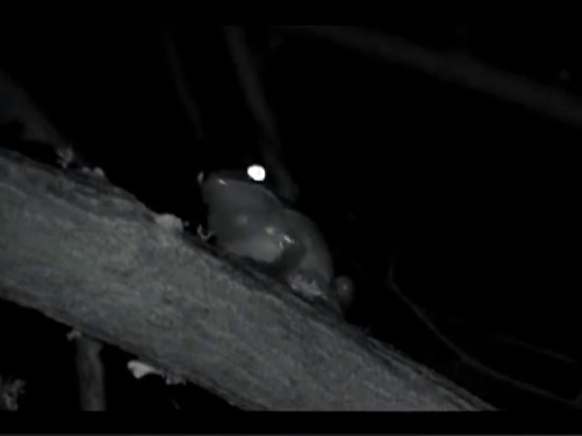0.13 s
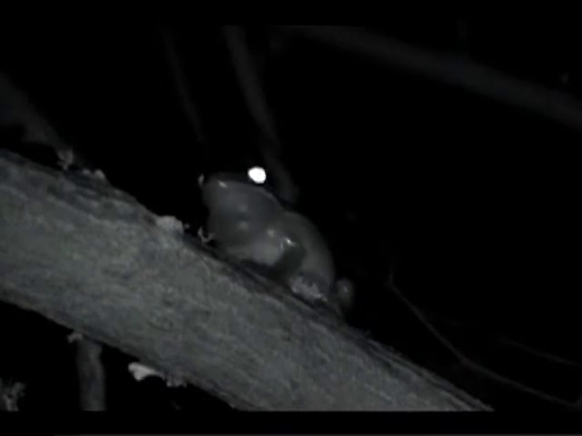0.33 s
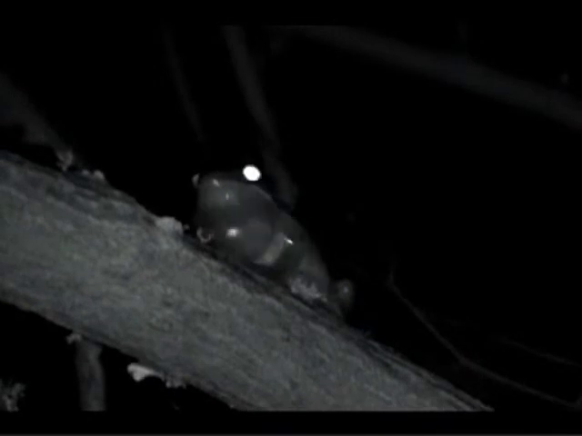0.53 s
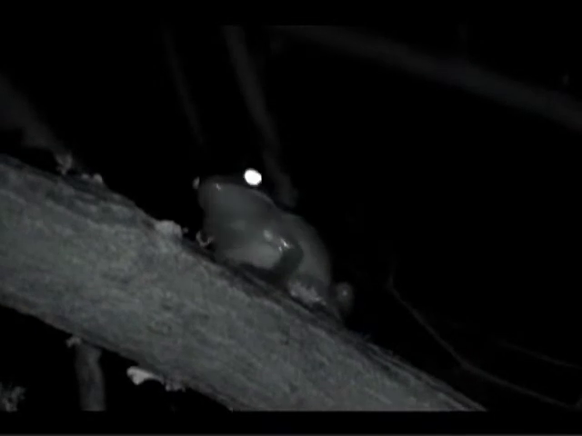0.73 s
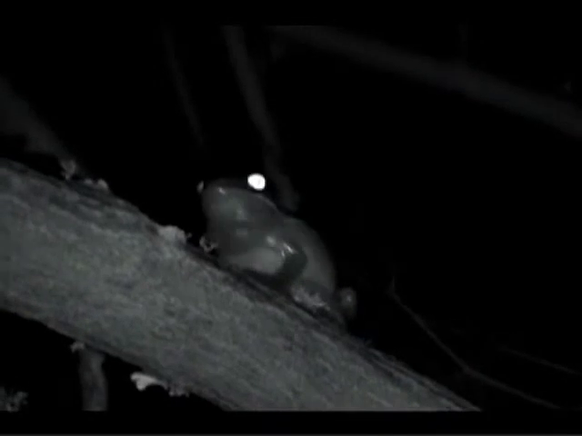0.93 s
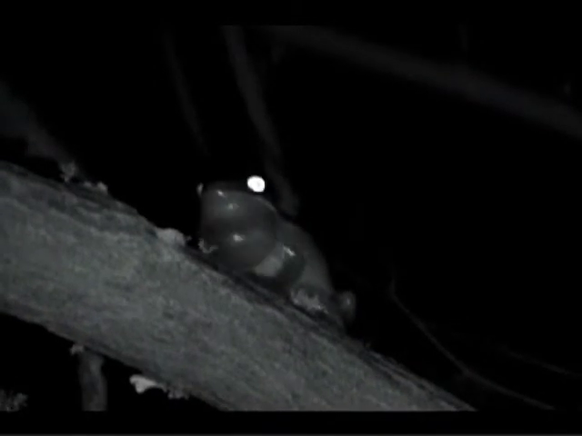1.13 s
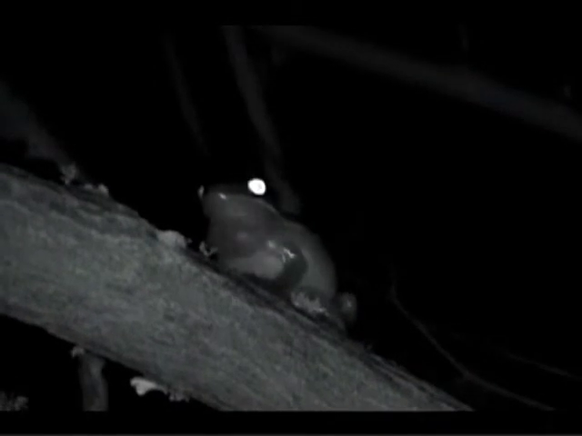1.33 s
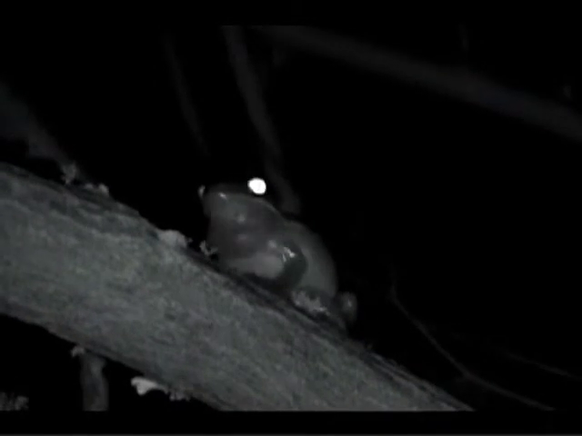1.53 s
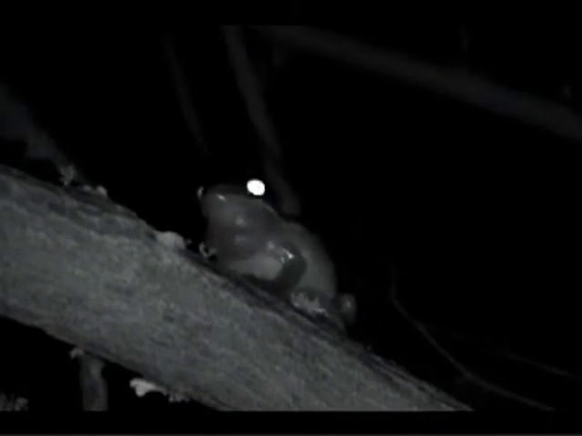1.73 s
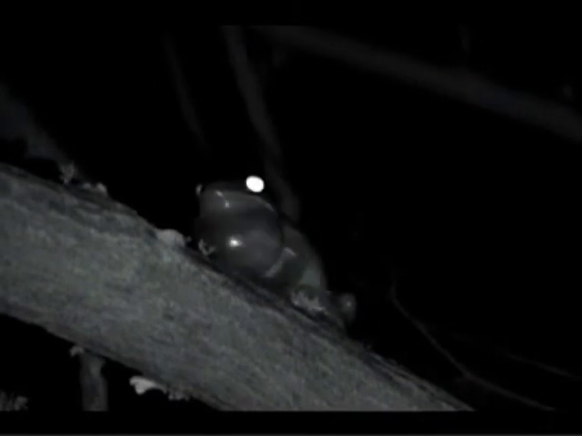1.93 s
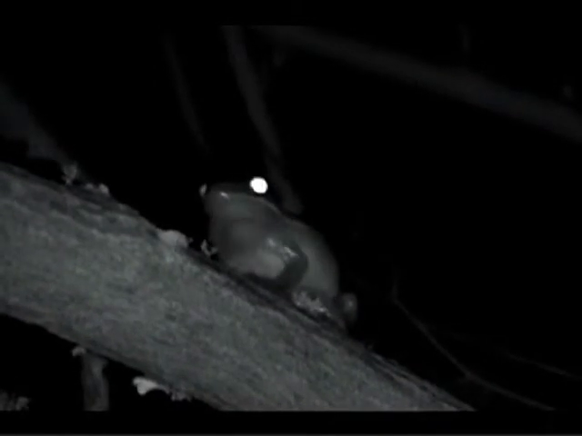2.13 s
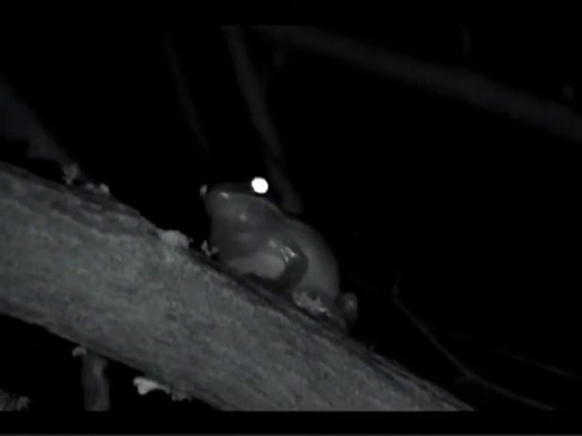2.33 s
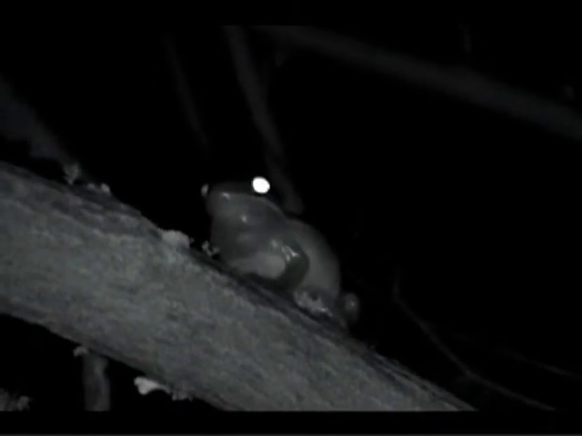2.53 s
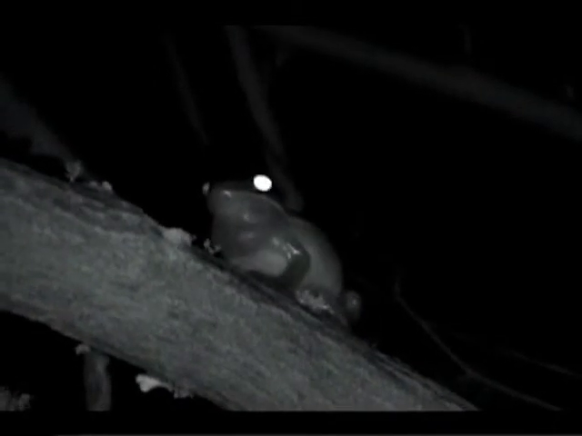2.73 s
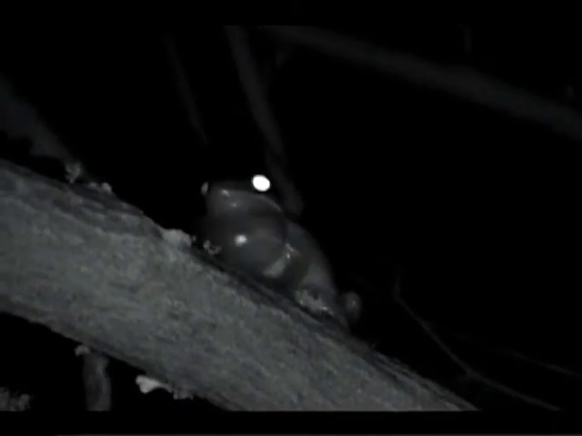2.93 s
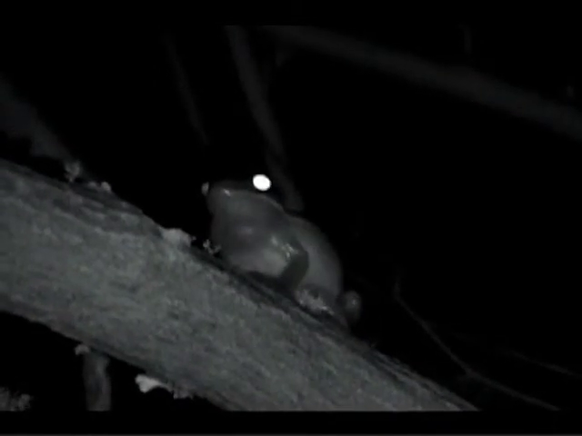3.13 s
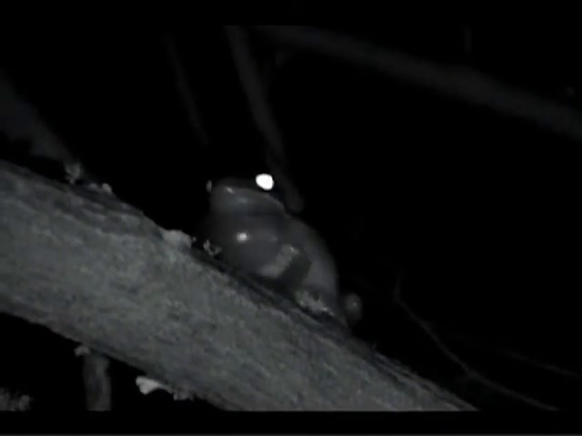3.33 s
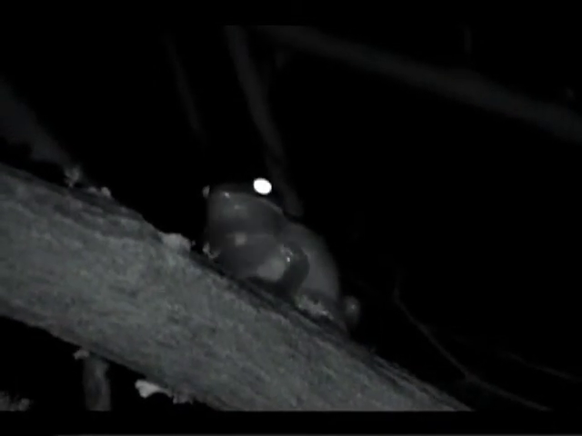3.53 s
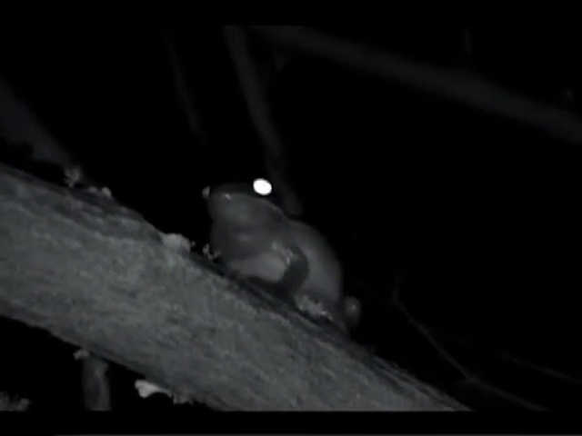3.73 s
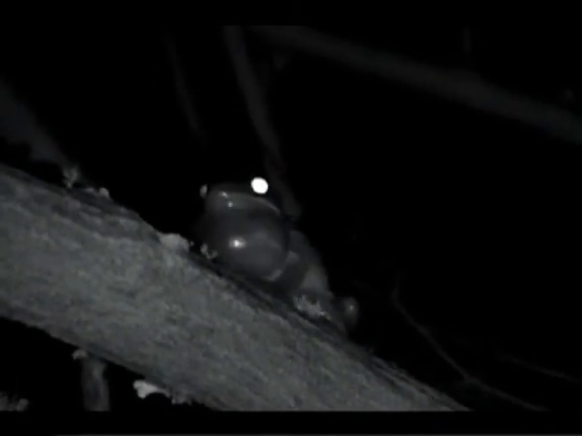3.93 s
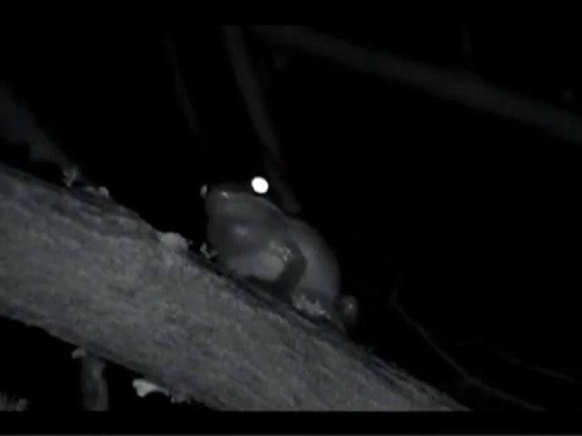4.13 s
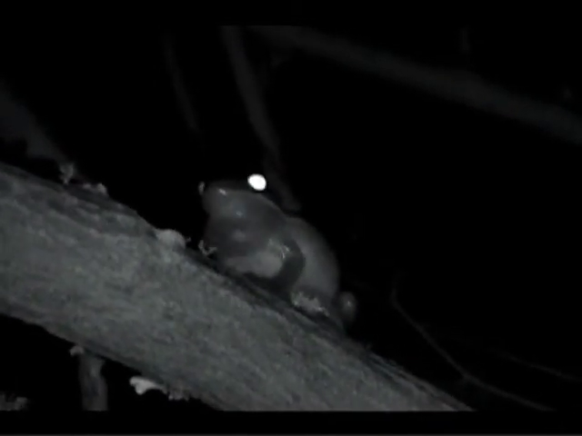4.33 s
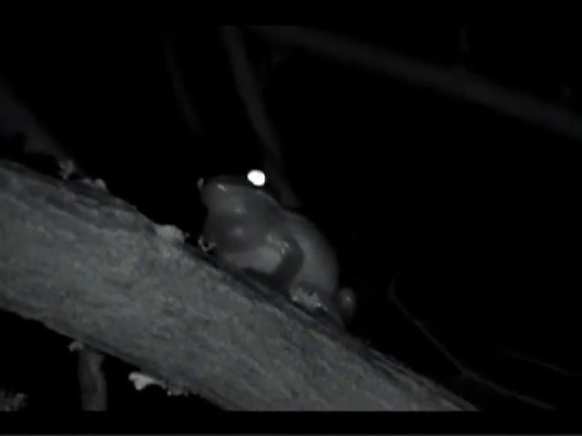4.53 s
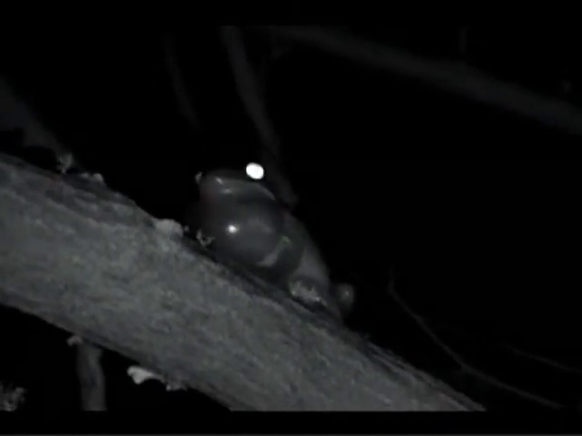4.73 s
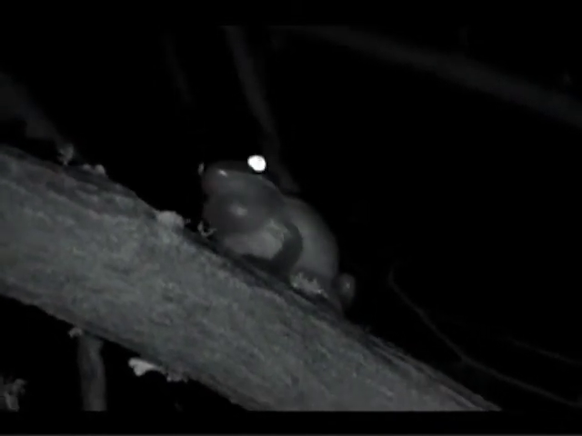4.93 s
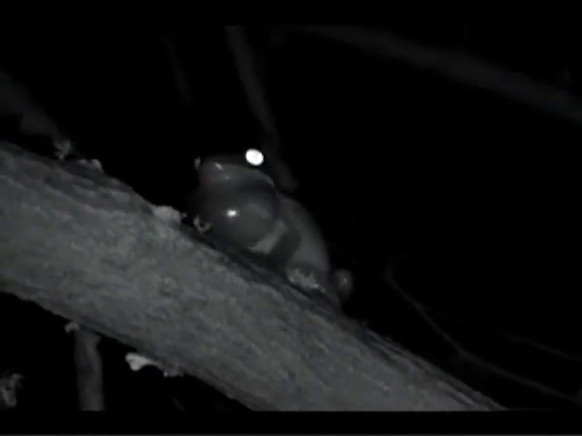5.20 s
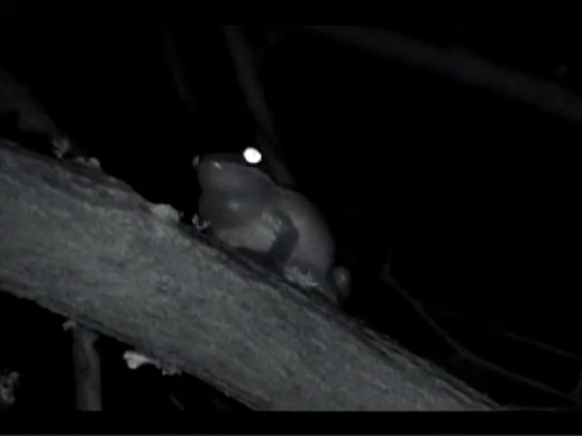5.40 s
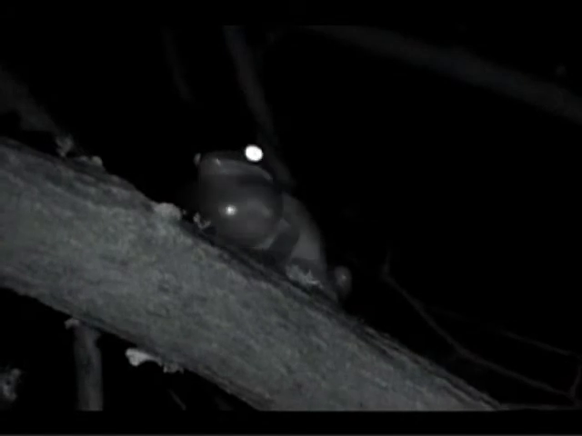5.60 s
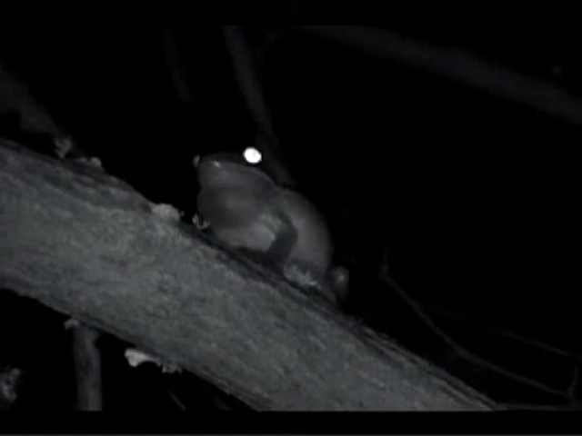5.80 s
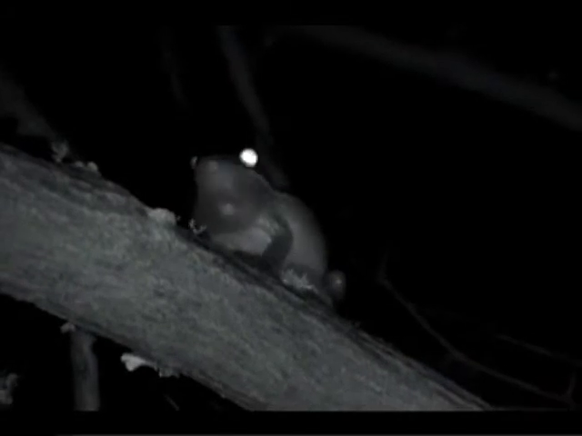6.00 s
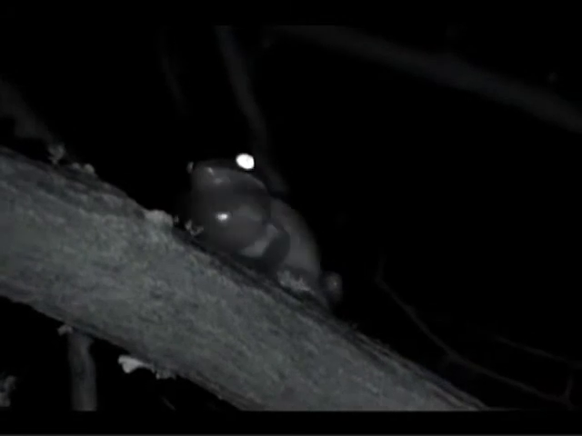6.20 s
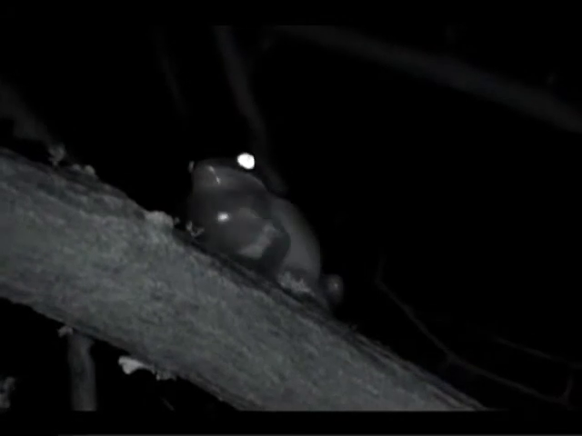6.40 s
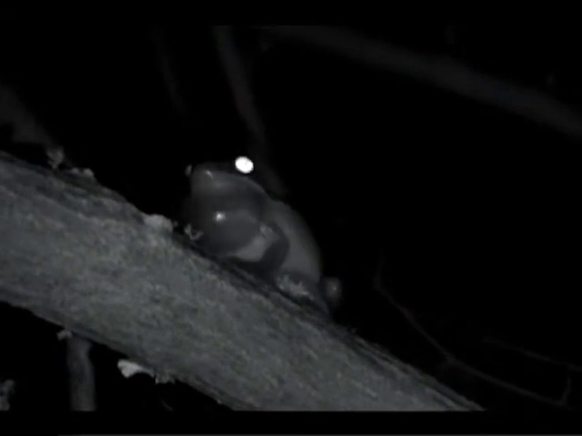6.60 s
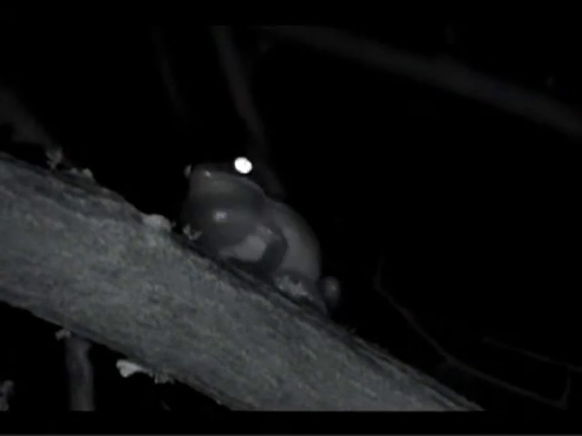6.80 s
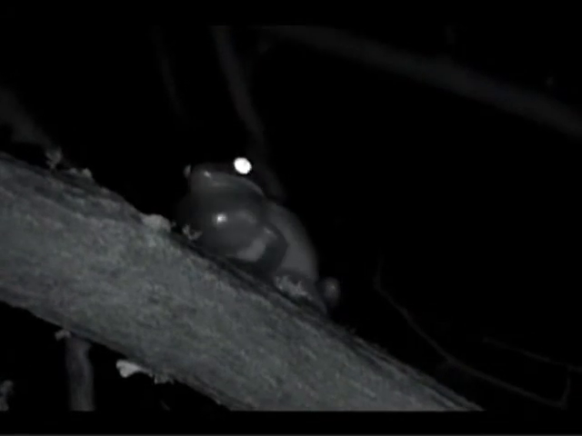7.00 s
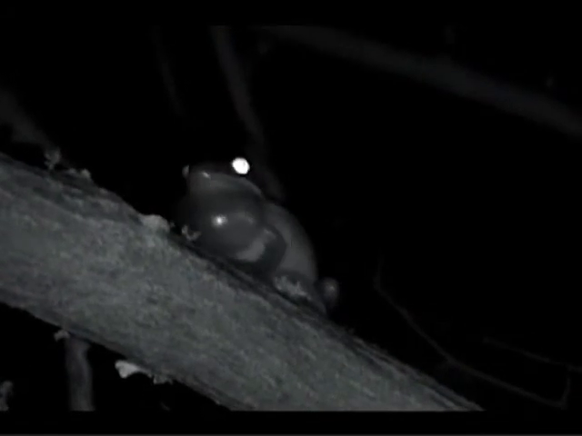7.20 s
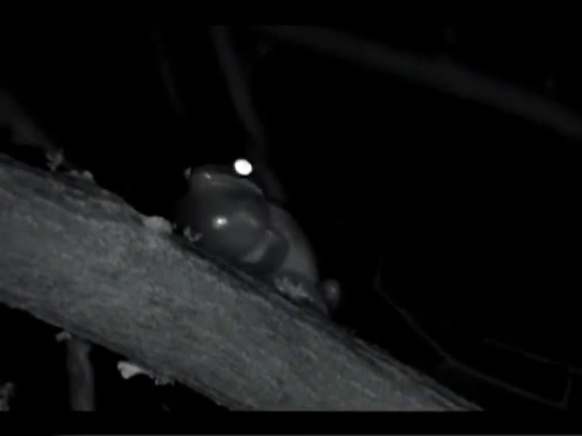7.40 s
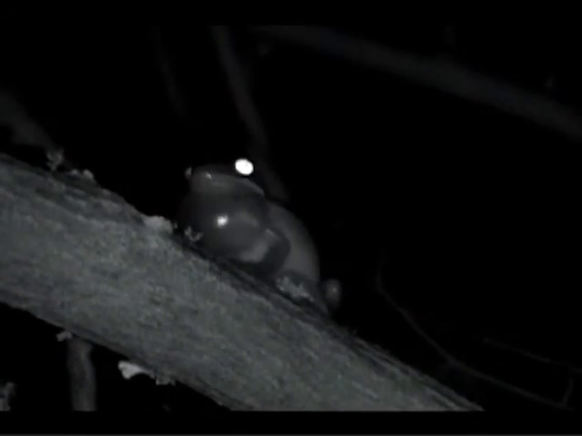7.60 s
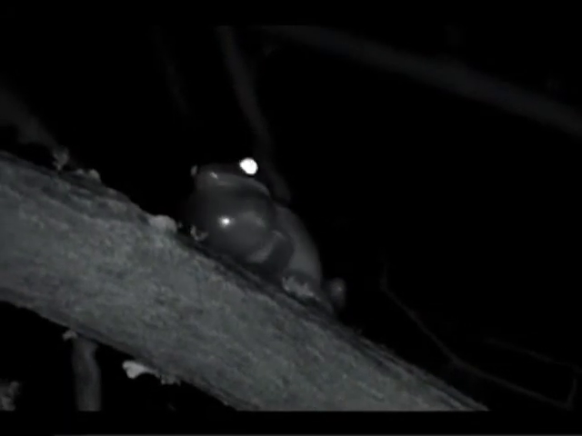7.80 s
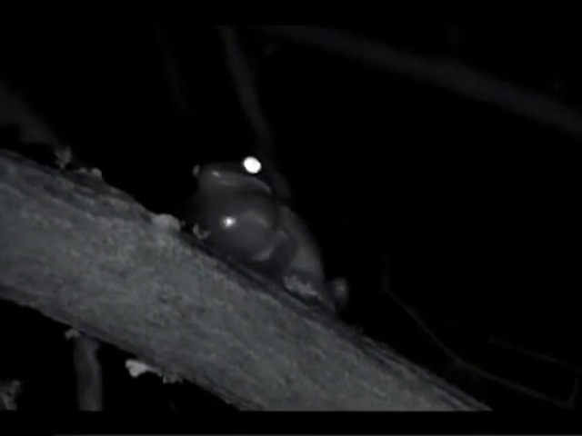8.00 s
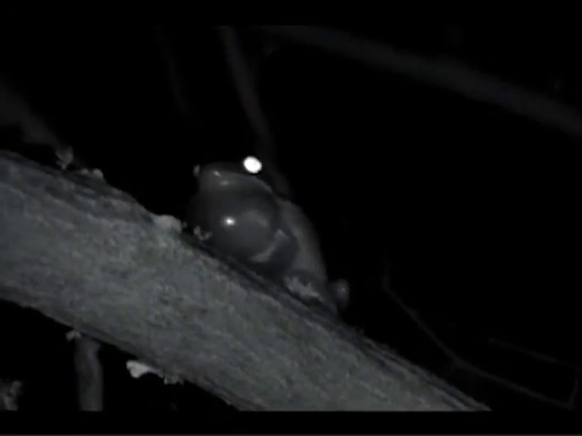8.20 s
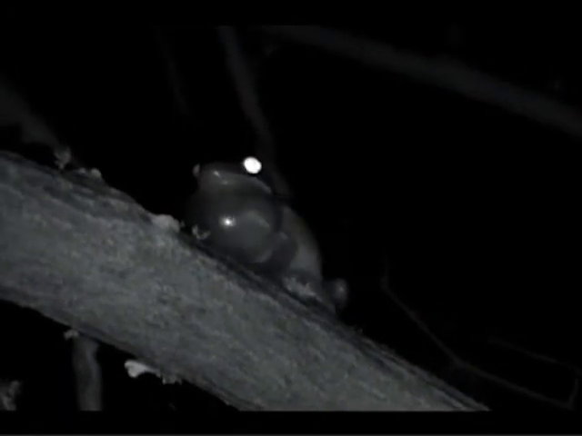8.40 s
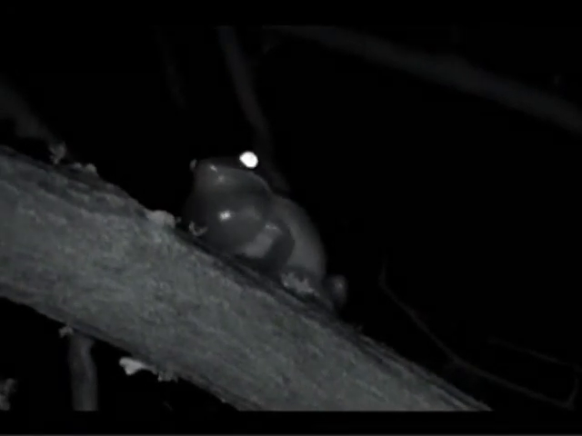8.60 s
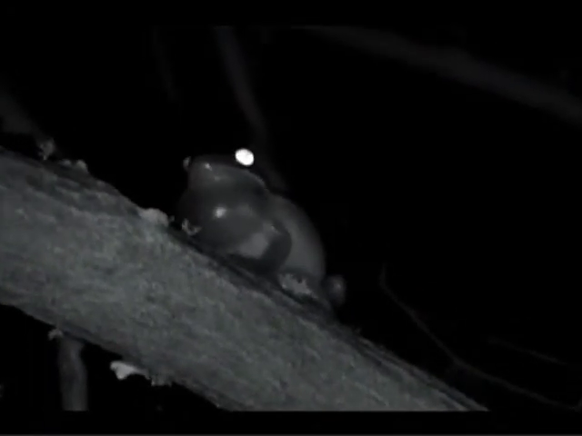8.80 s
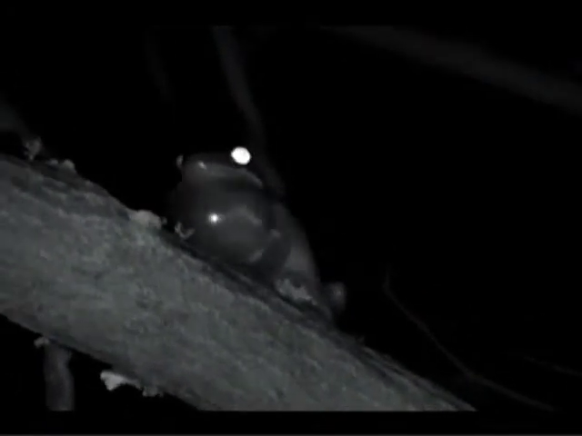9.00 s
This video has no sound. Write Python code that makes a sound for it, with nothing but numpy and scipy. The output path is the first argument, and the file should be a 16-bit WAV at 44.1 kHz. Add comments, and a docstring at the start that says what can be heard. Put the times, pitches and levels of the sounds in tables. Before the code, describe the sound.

Night outdoors: one small frog squeaks weakly, honks louder and louder, then hurries into quick stuttered calls while leaves crackle quietly nearby.

```python
"""On a branch at night a tree frog calls, close by: three thin squeaks, then full honks, then quick stuttering calls.
Its vocal cords swing near 1 kHz; rasp makes every third swing stand out, which gives the honk its nasal sound.
Leaves rustle and crunch nearby as bursts of tiny snaps; far frogs and insects are bands of noise over soft night air.
Short echoes surround the frog, and the recorder's limiter turns everything down when a call gets too loud."""
import sys
import numpy as np
from scipy import signal
from scipy.fft import rfft, irfft, next_fast_len
from scipy.io import wavfile
from scipy.ndimage import uniform_filter1d, minimum_filter1d

SR = 44100
rng = np.random.default_rng(int(sys.argv[2]) if len(sys.argv) > 2 else 0)


def transcribe(u):
    """Save the signal u as a 16-bit wav file named by the first command-line argument.

    u: samples, shape (n,) or (channels, n), limited to [-1, 1]; the rate is SR.
    q: integer samples, one column per channel.
    """
    v = np.clip(np.atleast_2d(u).T, -1, 1)
    q = np.round(v * 32767).astype(np.int16)
    wavfile.write(sys.argv[1], SR, q)


N = 398223
TIME = np.arange(N) / SR

# Warm-up squeaks. Each row: start in seconds, length in seconds, time to the crack in seconds,
# length of the crack in seconds, level in dB, pitch before the crack in Hz, pitch after it in Hz,
# change of level across it in dB.
SQUEAK_CALLS = [(0.416, 0.061, 0.026, .021, -18.5, 891, 954, -8),
                (0.936, 0.054, .017, 0.016, -13, 951, 949, 0),
                (1.823, 0.061, 0.013, 0.032, -12.5, 964, 1090, 3.5)]
# Honks. Each row: start in seconds, length in seconds, level in dB, cord pitch in Hz, roughness from 0 to 1.
HONK_CALLS = [(2.756, 0.094, -10, 991, 1), (3.271, 0.091, -8.5, 1006, 0.76),
              (3.795, 0.091, -4.5, 1011, 0.44), (4.57, 0.091, -3.5, 1002, 0.28),
              (5.004, 0.088, -4, 1015, 0.25), (5.489, 0.091, -1.5, 1011, 0.22),
              (5.987, 0.095, -1.5, 1006, 0.2)]
# Stuttering calls. Each row: time of the main pulse in seconds, length in seconds, level in dB,
# cord pitch in Hz, level of the lead pulse against the main one in dB, pulse spacing as a ratio.
STUTTER_CALLS = [(6.347, 0.069, -5, 1011, -9, 0.66), (6.602, 0.069, -5.5, 1016, -3, 0.82),
                 (6.841, 0.071, -9.5, 1013, -4.5, 0.77), (7.052, 0.062, -4.5, 1017, 1, 0.79),
                 (7.274, 0.069, -2.5, 1009, -15.5, 0.89), (7.457, 0.06, -2, 1025, -8, 0.84),
                 (7.674, 0.068, -3.5, 1011, -11.5, 0.82), (7.879, 0.061, -3, 1028, -7, 0.8),
                 (8.114, 0.059, -5, 1010, -7, 0.95), (8.331, 0.06, -2.5, 1015, -7.5, 0.82),
                 (8.572, 0.062, -5, 1010, -7, 0.76), (8.882, 0.078, -10.5, 1012, -9.5, 0.81)]
# Resonances of the throat and the taut vocal sac. Each row: frequency in Hz, width in Hz, strength in dB.
TAUT_SAC = [(1035, 364, 1), (1840, 800, 11), (1965, 693, 12), (2822, 184, 10.5), (3250, 56, 5.5),
            (3697, 102, -4.5), (4770, 270, -16), (6160, 137, -13), (6506, 70, -16)]
# The same while the sac is still slack. Each row: frequency in Hz, width in Hz, strength in dB.
SLACK_SAC_MODES = [(1050, 430, -0.5), (1850, 196, 4.5), (2586, 593, -1.5), (3840, 870, -10.5),
                   (4590, 67, -5), (5760, 230, -13)]
# Echoes from the branch and nearby leaves. Each row: delay in seconds, level in dB.
BRANCH_ECHOES = [(.00187, -36), (.00413, -10), (.0067, -46.5), (0.0104, -11)]
# Rustles in the leaves. Each row: start in seconds, hold in seconds, relative level in dB,
# relative crispness in dB.
LEAF_RUSTLES = [(0.0, 0.072, -31, -7), (0.326, 0.097, -35.5, -1.5), (0.994, 0.28, -31.5, -10.5),
                (1.531, .13, -30, -12.5), (1.827, 0.049, -31.5, -6.5), (2.137, 0.11, -37.5, -8),
                (2.274, .1, -38.5, 2), (2.439, 0.18, -31, -10.5), (2.884, 0.096, -33.5, -3.5),
                (3.174, 0.17, -36, -2.5), (3.425, 0.16, -37, -10), (4.119, 0.055, -33, -8),
                (4.18, 0.44, -31.5, -7), (5.186, 0.15, -31, -7.5), (5.851, .04, -34.5, -9.5),
                (5.945, 0.11, -31, -5)]
# Crunches in the leaf litter. Each row: start in seconds, relative peak in dB.
LITTER_CRUNCHES = [(0.271, -25), (0.346, -21), (1.05, -20.5), (1.523, -22.5), (1.545, -22), (2.137, -24),
                   (2.295, -23), (2.451, -16), (2.894, -21), (3.176, -24.5), (3.495, -25.5), (4.119, -20),
                   (4.372, -21), (5.19, -22), (5.851, -22), (6.746, -30), (7.149, -29), (7.62, -22),
                   (8.752, -27.5)]
# Tone colour of snapping leaves. Each row: frequency in Hz, relative strength in dB per Hz.
LEAF_SPECTRUM = [(150, -22.5), (400, -13.5), (600, -4.5), (1300, 0), (2400, -0.5), (3300, -6),
                 (4500, -13.5), (6000, -23.5), (9000, -33.5), (11500, -38), (14000, -84)]
# Tone colour of crunching litter. Each row: frequency in Hz, relative strength in dB per Hz.
LITTER_SPECTRUM = [(150, 2), (350, 7.5), (700, 12), (1300, 6), (2500, -22), (5000, -61), (14000, -71)]
# Tone colour of the night air. Each row: frequency in Hz, relative strength in dB per Hz.
NIGHT_SPECTRUM = [(20, -12.5), (50, -5), (90, -2.5), (160, 4), (280, -4), (450, -7), (650, -1), (1500, -6),
                  (2600, -5.5), (4000, -14), (5500, -22), (8500, -37), (13000, -30.5), (15000, -58)]
# Far chorus of frogs and insects. Each row: frequency in Hz, width in Hz, relative level in dB.
FAR_CHORUS = [(3040, 266, -37), (6935, 414, -43.5)]
# Faint hum. Each row: frequency in Hz, relative level in dB.
FAINT_HUM = [(182, -58), (253, -60), (360, -52.5)]
# Slow changes of the recorder's gain on the background. Each row: time in seconds, gain in dB.
BACKGROUND_GAIN = [(0, -2.5), (2.5, -2.5), (4.7, -2), (5.8, -4), (6.6, -5), (7.6, -2), (9.0, -7.5)]

# At roughness 1: pitch jitter as a share of the pitch, and pulse-to-pulse shimmer in dB.
JITTER, SHIMMER_DB = .03, 3
SAC_LOW_HZ = 840  # a sac this small radiates little lower
SQUEAK_ROUGH = .55  # roughness outside the crack, 0-1
START_RASP = .5  # share of a honk's rasp before it locks in, 0-1
STUTTER_ROUGH, STUTTER_RASP = .5, .7
STUTTER_AIR_DB = -17  # air hiss beside the cord pulses, before roughness adds to it
BEND_PER_DB = .0025  # the cords slacken between pushes: share of the pitch per dB of push
# First push of air in a stutter: time to the next one, hold, and rise and fall times (each over 20 dB).
PUSH_GAP_S, PUSH_HOLD_S, PUSH_RISE_S, PUSH_FALL_S = .015, 0.00229, .003, 0.0043
# From push to push the gap, the hold and the rise are multiplied by these.
GAP_GROWTH, HOLD_GROWTH, RISE_GROWTH = 1.3, 2.335, 1.1
# End of a honk or stutter: the tone has flipped up by this ratio this long before the end, then sags.
FLIP_BEFORE_S, FLIP_RATIO, SAG_PER_S = 0.01543, 1.10, 7.5
# The sound fades from this long before the end, and rings on a little after it.
FADE_BEFORE_S, FADE_DB_PER_S, TAIL_S = 0.0049, 1395, 0.029
# Every rustle swells quickly, then dies away and dulls as the leaves settle.
RUSTLE_ATTACK_S, RUSTLE_FADE_DB_PER_S, RUSTLE_DULL_DB_PER_S = 0.004, 55.5, 39.5
NIGHT_DB, WOODS_DB, WOODS_T60_S = -35.5, -23.5, 0.32  # T60: time for the echo to fall by 60 dB
CUTOFF_HZ = 14400


def squeaks(attack_s=0.0031, attack_db=14, decay_s=0.038, decay_db=20, rise_hz_per_s=3000,
            sag_hz_per_s=4300, crack_ratio=1.2, break_s=0.0036, crack_rasp=0.22, tone_rasp=0.13,
            end_slack=0.15, wander=.012, uneven_db=-1.0, snap_db=-14):
    """Weak pushes into a slack sac: a nearly pure tone climbs, cracks roughly, and sags once the sac is full."""
    out = np.zeros(N)
    for start, length, crack_at, crack_length, db, open_hz, close_hz, close_db in SQUEAK_CALLS:
        t = np.arange(-2 * attack_s, length + decay_s, 1 / SR)
        since_crack = t - crack_at - crack_length
        cracked, healed = ramp(t - crack_at, break_s), ramp(since_crack, break_s)
        broken = cracked - healed  # 1 inside the crack
        filled = ramp(t - crack_at, crack_length)

        climbing = open_hz + rise_hz_per_s * np.minimum(t - crack_at, 0)
        climbing = climbing * (1 + (crack_ratio - 1) * cracked)
        sagging = close_hz - sag_hz_per_s * since_crack
        pitch = (1 - healed) * climbing + healed * sagging
        pitch = pitch * (1 + wander * drift(158, len(t)))

        edges_db = -attack_db * ramp(-t, attack_s) - decay_db * ramp(t - length, decay_s)
        level_db = db + close_db * filled + edges_db + uneven_db * drift(154, len(t))
        rasp = tone_rasp + crack_rasp * broken
        slack = 1 - (1 - end_slack) * filled
        squeak = voice(pitch, level_db, rasp, SQUEAK_ROUGH + broken, slack, soft_closure=0.2)
        add(out, start + t[0], squeak)
        add(out, start + crack_at, snap(db + snap_db))
    return out


def honks(flutter_hz=152, flutter_s=0.028, flutter_depth=0.78, sag_db_per_s=38, start_sharp=0.022,
          lead_s=0.009, lead_db=-14, rise_s=0.0011, start_slack=0.66, rough_slack=0.074,
          held_slack=0.16, hollow_hz=1950, hollow_width_hz=900, hollow_depth=0.73):
    """A few separate beats while the sac fills, then a locked, hollow rasp that ends in a sagging tone."""
    out = np.zeros(N)
    for start, length, db, hz, rough in HONK_CALLS:
        t = np.arange(-lead_s, length + TAIL_S, 1 / SR)
        bend, fade_db, locked = release(t - length)
        unsettled = np.exp(-(t / flutter_s) ** 4)
        beats = 1 - min(flutter_depth, 1) * unsettled * np.cos(np.pi * flutter_hz * t) ** 2
        swell_db = lead_db * ramp(-t, rise_s) - sag_db_per_s * t
        pitch = hz * bend * (1 + start_sharp * unsettled)
        rasp = locked * (1 - (1 - START_RASP) * unsettled) * (t > 0)
        ragged = rough + unsettled + .5 * (1 - locked)
        slack = held_slack + start_slack * unsettled + rough_slack * rough
        honk = beats * voice(pitch, db + fade_db + swell_db, rasp, ragged, slack, air_db=-25)
        # A clean, settled honk is hollow in the middle.
        middle = signal.lfilter(*signal.iirpeak(hollow_hz, hollow_hz / hollow_width_hz, fs=SR), honk)
        hollow = hollow_depth * (1 - unsettled) * (1 - rough)
        add(out, start + t[0], honk - hollow * middle)
    return out


def stutters(lead_sharp=0.048, uneven_db=3.68, slack=0.37, lead_slack=0.2, lead_rasp=0.24,
             thin_hz=1200, snap_db=-25, snap_spread_db=3.5, wander=0.02):
    """A short, slightly sharp lead pulse, a hard main one and two longer, uneven ones, with unsteady pitch."""
    out = np.zeros(N)
    for start, length, db, hz, lead_db, spacing in STUTTER_CALLS:
        t = np.arange(-PUSH_GAP_S - 2 * PUSH_RISE_S, length + TAIL_S, 1 / SR)
        bend, fade_db, locked = release(t - length)
        push_db = pushes(t, spacing, 0)
        lead = ramp(-t, PUSH_GAP_S / 2)
        pitch_shift = lead_sharp * lead + BEND_PER_DB * push_db + wander * drift(119.7, len(t))
        pitch = hz * bend * (1 + pitch_shift)
        level_db = db + pushes(t, spacing, lead_db) + fade_db + uneven_db * drift(100.4, len(t))
        stumble = 1 - from_db(push_db)  # weak flow makes the cords stumble
        ragged = STUTTER_ROUGH + .5 * (1 - locked) + stumble
        rasp = STUTTER_RASP * locked * (1 - lead) + lead_rasp * lead
        call = voice(pitch, level_db, rasp, ragged, slack + lead_slack * lead,
                     air_db=STUTTER_AIR_DB, top_hz=8100)
        add(out, start + t[0], call)
        add(out, start, snap(db + snap_db + snap_spread_db * rng.standard_normal()))
    return cut(out, thin_hz, "high", order=1)  # a gentle low cut thins the tone near 1 kHz


def voice(cord_hz, level_db, rasp, rough, slack, air_db=-22, soft_closure=0.1, top_hz=7800):
    """Cord pulses ring the vocal sac; rasp favours every third pulse, adding tones a third of the pitch apart."""
    size = len(cord_hz)
    jittered_hz = cord_hz * (1 + JITTER * rough * drift(600, size))
    phase = 2 * np.pi * np.cumsum(jittered_hz) / (3 * SR)  # one turn for every three swings
    rasp, slack = np.clip(rasp, 0, 1), np.clip(slack, 0, 1)
    slope = soft_closure * (1 - rasp)  # without rasp the cords close gently and the top overtones fade
    pulses = 0
    for k in range(3, 27):
        strength = (rasp if k % 3 else 1) * (6 / k) ** slope
        pulses = pulses + np.cos(k * phase) * strength
    pulses = rms_one(pulses) * from_db(SHIMMER_DB * rough * drift(509.8, size))
    flow = pulses + from_db(air_db) * (1 + 2 * rough) * rng.standard_normal(size)
    ringing = (1 - slack) * resonate(flow, TAUT_SAC) + slack * resonate(flow, SLACK_SAC_MODES)
    sound = cut(ringing, top_hz, "low", order=6)
    # Even out the loudness, so that level_db shapes it.
    even = sound / np.sqrt(uniform_filter1d(sound ** 2, size=264) + 1e-9)
    shaped = even * from_db(level_db) * signal.windows.tukey(size, .06)
    return cut(shaped, SAC_LOW_HZ, "high", order=8)


def resonate(x, modes):
    """Resonances side by side, neighbours swinging in opposite senses."""
    out = 0
    for k, (hz, width_hz, db) in enumerate(modes):
        ring = signal.lfilter(*signal.iirpeak(hz, hz / width_hz, fs=SR), x)
        out = out + (-1) ** k * from_db(db) * ring
    return out


def release(t, flip_s=0.0048, loose_rasp=.04, flip_db=-2):
    """Falling pressure: rasp nearly stops, the tone flips up, sags, fades; t from the end -> pitch ratio, dB, rasp."""
    since_flip = t + FLIP_BEFORE_S
    flipped = ramp(since_flip + flip_s, flip_s)
    bend = 1 + (FLIP_RATIO - 1) * flipped - SAG_PER_S * np.maximum(since_flip, 0)
    fade_db = flip_db * flipped - FADE_DB_PER_S * np.maximum(t + FADE_BEFORE_S, 0)
    return bend, fade_db, 1 - (1 - loose_rasp) * flipped


def pushes(t, spacing, lead_db, tire_db=1.62, dip_db=-30, count=4):
    """Air flow of a stutter in dB: later pushes rise more slowly and hold longer; the main one is at t = 0."""
    at = -PUSH_GAP_S
    flow_db = dip_db + lead_db * (t < 0) - 20 * ramp(-PUSH_GAP_S - t, PUSH_RISE_S)
    for k in range(count):
        early = np.maximum(at - t, 0) / (PUSH_RISE_S * RISE_GROWTH ** k)
        late = np.maximum(t - at - PUSH_HOLD_S * HOLD_GROWTH ** k, 0) / PUSH_FALL_S
        late = late * (k < count - 1)  # the last push holds to the end
        peak_db = -tire_db * (k - 1) if k else lead_db
        flow_db = np.maximum(flow_db, peak_db - 20 * (early + late))
        at += PUSH_GAP_S * GAP_GROWTH ** k * (spacing if k else 1)
    return flow_db


def snap(db, decay_s=0.0044, low_hz=2500, top_hz=7000):
    """A tiny bright tick at the hard start of a sound: a fading burst of noise."""
    t = np.arange(SR // 50) / SR
    noise = cut(rng.standard_normal(len(t)), [low_hz, top_hz], "band", order=2)
    return from_db(db) * np.exp(-t / decay_s) * noise


def branch(x):
    """Close echoes thicken the pulses and pit the spectrum."""
    out = x.copy()
    for delay_s, db in BRANCH_ECHOES:
        add(out, delay_s, from_db(db) * x)
    return out


def woods(x, dull_hz=5500, first_s=0.0057):
    """Trunks and foliage scatter the sound into a short, faint tail."""
    t = np.arange(SR // 2) / SR
    noise = cut(rng.standard_normal(len(t)), dull_hz, "low", order=2)
    scatter = noise * from_db(-60 * t / WOODS_T60_S) * (t > first_s)
    return from_db(WOODS_DB) * signal.fftconvolve(x, scatter / np.linalg.norm(scatter))[:N]


def leaves(rustle_db=1.5, crisp_db=13, split_hz=3500, clump_db=1.6, crunch_db=-10, crunch_s=0.013,
           crisp_rise_s=0.054):
    """Clumps of snapping leaves, with a duller crunch where the litter gives way."""
    body_power, crackle_power = np.zeros(N), np.zeros(N)
    age = TIME[:2 * SR]
    for start, hold, db, crispness_db in LEAF_RUSTLES:
        settling = np.maximum(age - hold, 0)
        swell_db = db + rustle_db - RUSTLE_FADE_DB_PER_S * settling
        swell = ramp(age, RUSTLE_ATTACK_S) * from_db(swell_db)
        bright_db = crispness_db + crisp_db - RUSTLE_DULL_DB_PER_S * settling
        crisp = ramp(age, crisp_rise_s) * from_db(bright_db)
        add(body_power, start, swell ** 2)
        add(crackle_power, start, (swell * crisp) ** 2)
    snaps = colour(grains(7000, spread_db=2.5), LEAF_SPECTRUM) * from_db(clump_db * drift(70, N))
    body = cut(snaps, split_hz, "low", order=3)
    crackle = cut(snaps, split_hz, "high", order=3)
    rustle = np.sqrt(body_power) * body + np.sqrt(crackle_power) * crackle

    crunch_gain = np.zeros(N)
    age = TIME[:SR // 5] / crunch_s
    for start, db in LITTER_CRUNCHES:
        add(crunch_gain, start, from_db(db + crunch_db) * np.sqrt(age) * np.exp(1 - age))
    return rustle + crunch_gain * colour(grains(4000, spread_db=5.0), LITTER_SPECTRUM)


def grains(per_s, spread_db):
    """Many tiny snaps of uneven size, at random times."""
    sizes = from_db(spread_db * np.minimum(rng.exponential(1, N), 4)) * rng.choice([-1, 1], N)
    return sizes * (rng.random(N) < per_s / SR)


def night(throb_db=3.5, rumble_hz=350, rumble_db=2.0, rumble_fade_db_per_s=0.46):
    """Still air with a slowly receding rumble, a faint hum and the blurred bands of many far callers."""
    air = from_db(NIGHT_DB) * colour(rng.standard_normal(N), NIGHT_SPECTRUM)
    rumble = cut(air, rumble_hz, "low", order=3) * from_db(rumble_db - rumble_fade_db_per_s * TIME)
    out = rumble + cut(air, rumble_hz, "high", order=3)
    for hz, width_hz, db in FAR_CHORUS:
        band = cut(rng.standard_normal(N), [hz - width_hz / 2, hz + width_hz / 2], "band", order=2)
        out += rms_one(band) * from_db(db + throb_db * drift(13, N))
    for hz, db in FAINT_HUM:
        phase = 2 * np.pi * np.cumsum(hz * (1 + 0.01012 * drift(5.7, N))) / SR
        out += np.sqrt(2) * from_db(db) * np.sin(phase)
    return out * from_db(follow(BACKGROUND_GAIN, TIME)[0])


def from_db(db):
    """Turn decibels into a gain."""
    return 10 ** (np.asarray(db) / 20)


def rms_one(x):
    """Scale a sound to an average power of 1."""
    return x / np.sqrt(np.mean(x ** 2) + 1e-20)


def ramp(t, length_s):
    """Rise from 0 at time zero to 1 after length_s."""
    return np.clip(t / length_s, 0, 1)


def drift(rate, size):
    """A random wander around 0: rate fresh values a second, joined by straight lines."""
    steps = np.arange(size) * rate / SR
    return np.interp(steps, np.arange(size), rng.standard_normal(size))


def follow(rows, t):
    """Read each column of a curve at times t."""
    s, *columns = np.transpose(rows)
    return [np.interp(t, s, c) for c in columns]


def add(out, start_s, sound):
    """Mix a sound in at its time."""
    i = max(int(start_s * SR), 0)
    out[i:i + len(sound)] += sound[:max(N - i, 0)]


def cut(x, hz, kind, order):
    """Keep the low, high or middle part of a sound with a Butterworth filter."""
    return signal.sosfilt(signal.butter(order, hz, kind, fs=SR, output="sos"), x)


def colour(x, spectrum):
    """Shape a sound by a spectrum, then scale it to an average power of 1."""
    hz, db = np.transpose(spectrum)
    size = next_fast_len(N)
    bins = np.maximum(np.arange(size // 2 + 1) * SR / size, 1)
    gain = from_db(np.interp(np.log(bins), np.log(hz), db))
    return rms_one(irfft(rfft(x, size) * gain, size)[:N])


def scene():
    """The frog in front of its surroundings."""
    frog = branch(squeaks() + honks() + stutters())
    return (frog + woods(frog) + leaves() + night())[None]


def record(dry, ceiling_db=-4, release_db_per_s=55):
    """A peak limiter holds loud calls down and lets the background swell back; the top is cut."""
    peak_db = 20 * np.log10(np.abs(dry[0]) + 1e-9)
    over_db = np.maximum(peak_db - ceiling_db, 0)
    # Hold each peak, then let go at a steady rate.
    recovery_db = release_db_per_s * TIME
    held_db = np.maximum.accumulate(over_db + recovery_db) - recovery_db
    gain_db = uniform_filter1d(minimum_filter1d(-held_db, size=100), size=100)
    top_cut = signal.ellip(10, .1, 80, CUTOFF_HZ, fs=SR, output="sos")
    return signal.sosfilt(top_cut, dry * from_db(gain_db))


dry = scene()
out = record(dry)
transcribe(out)
```